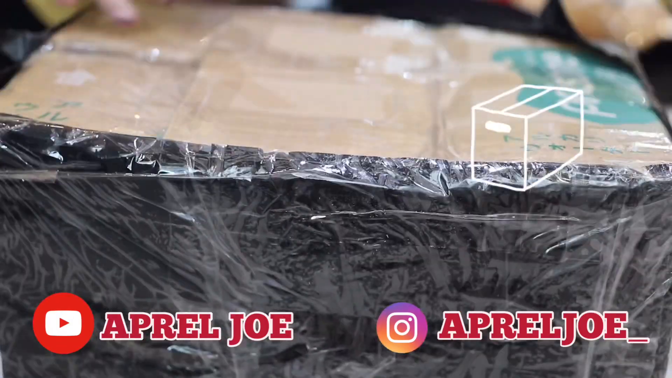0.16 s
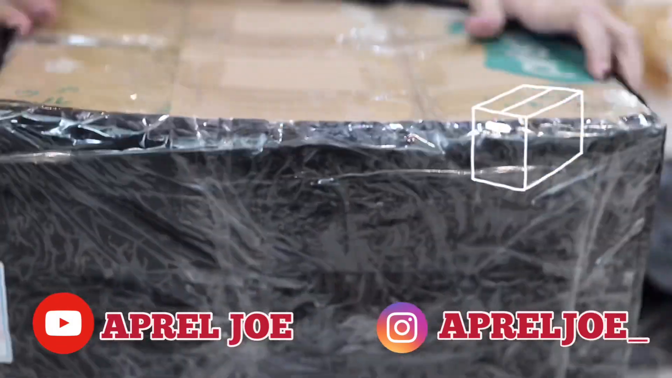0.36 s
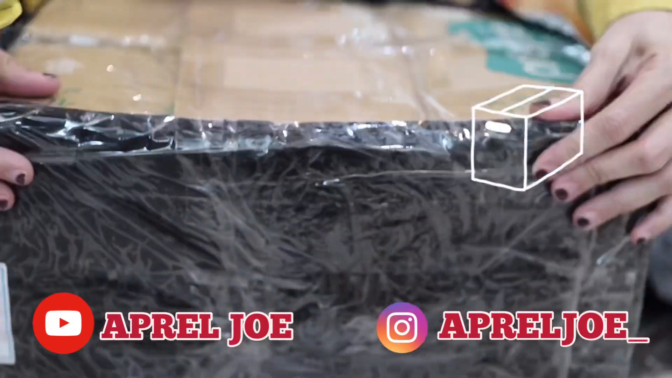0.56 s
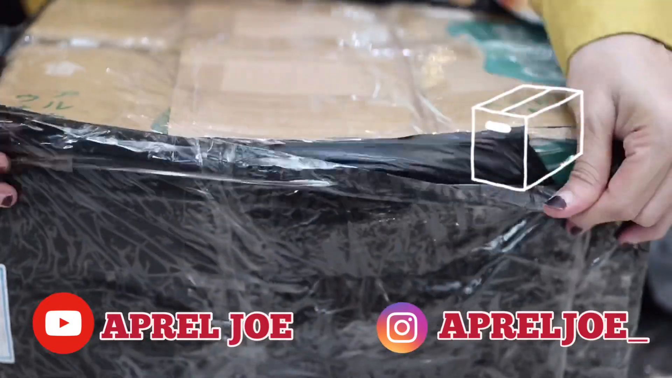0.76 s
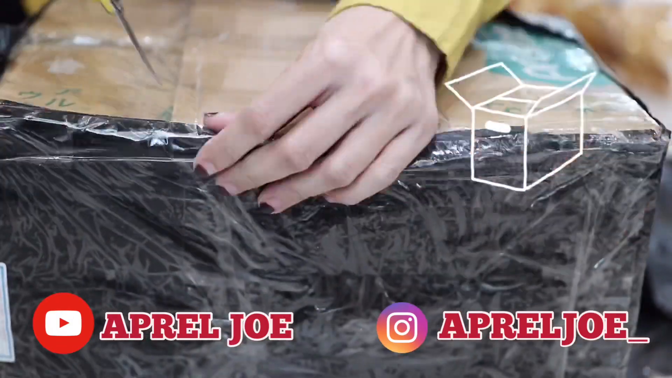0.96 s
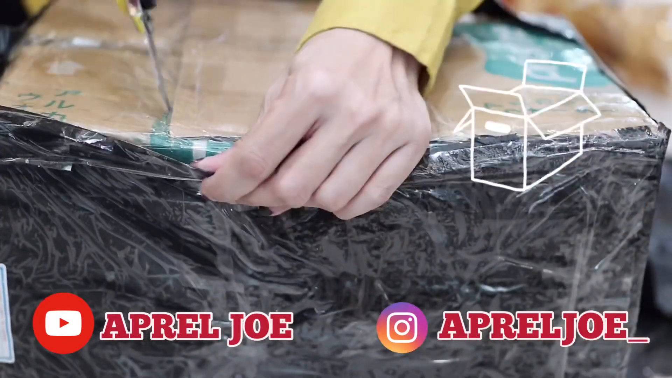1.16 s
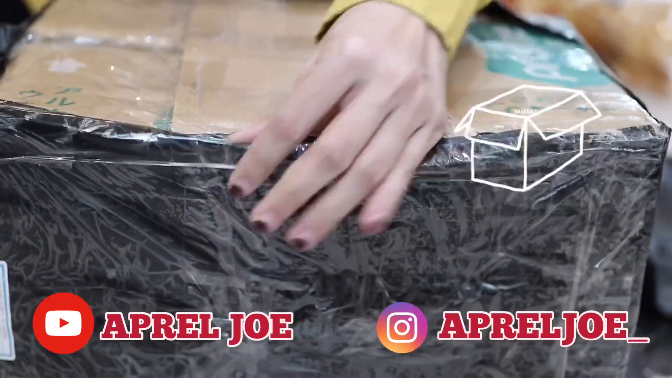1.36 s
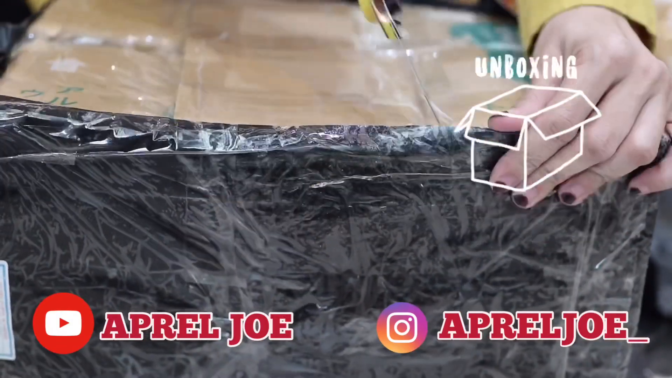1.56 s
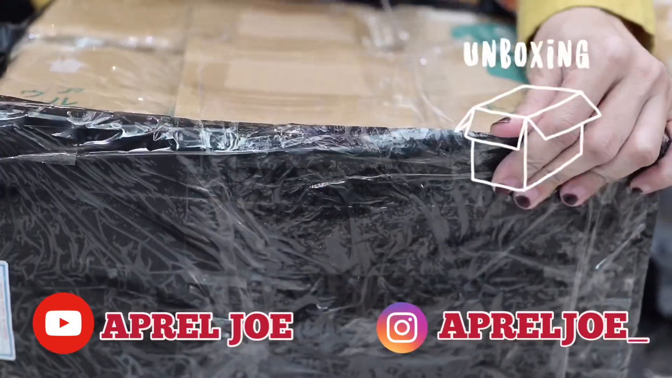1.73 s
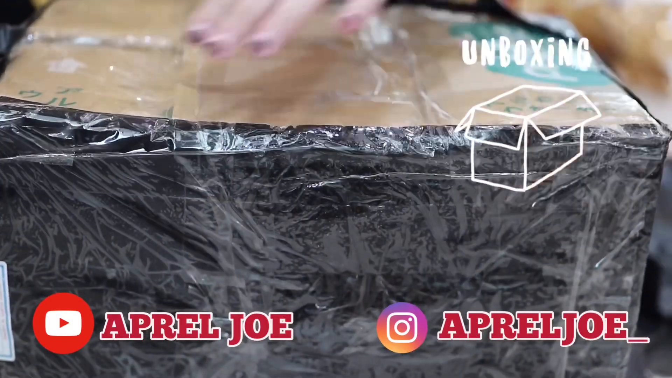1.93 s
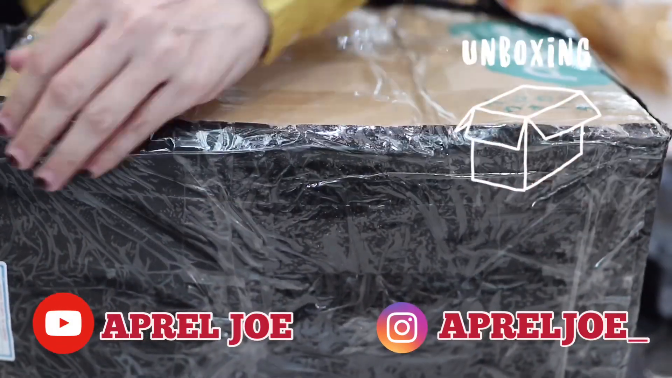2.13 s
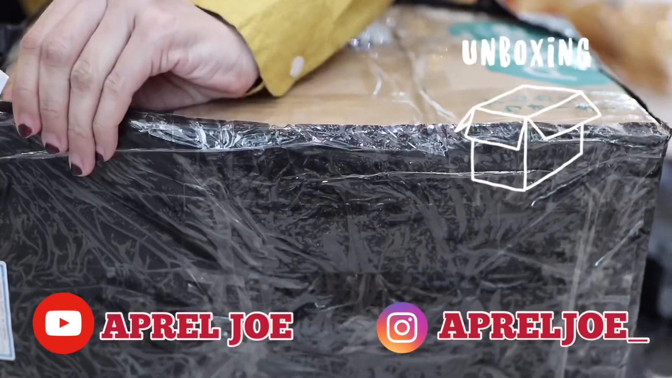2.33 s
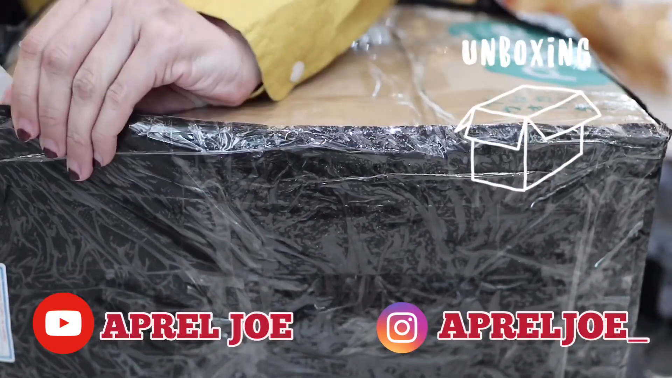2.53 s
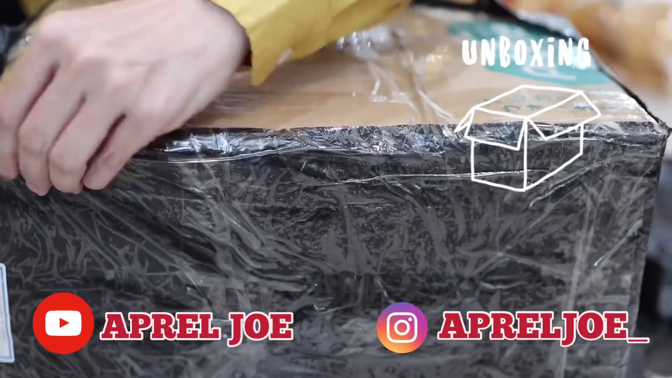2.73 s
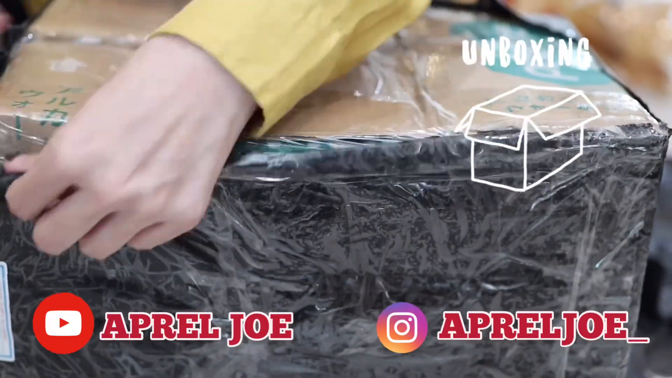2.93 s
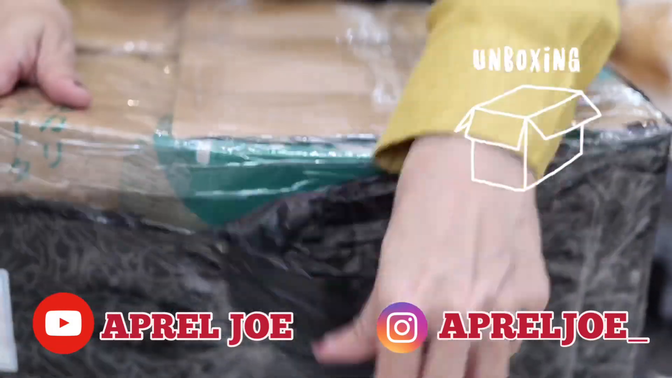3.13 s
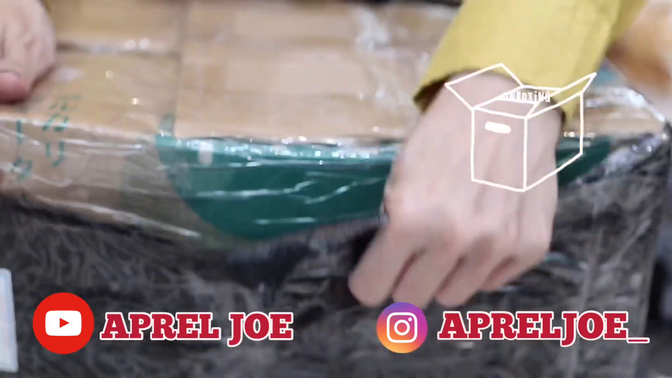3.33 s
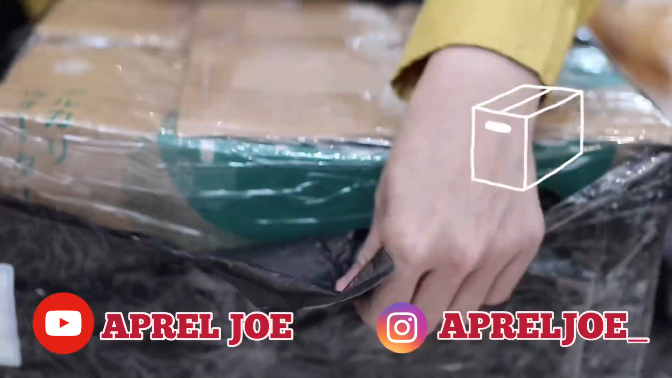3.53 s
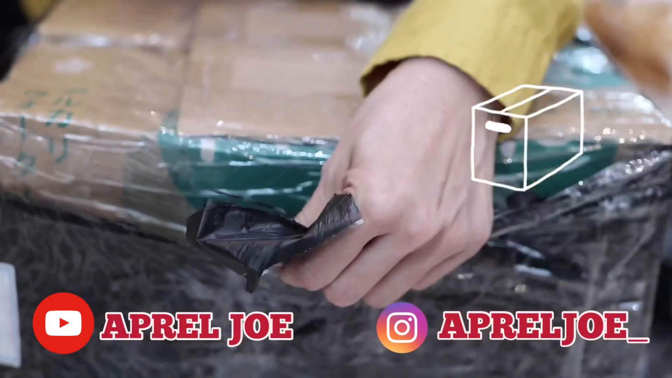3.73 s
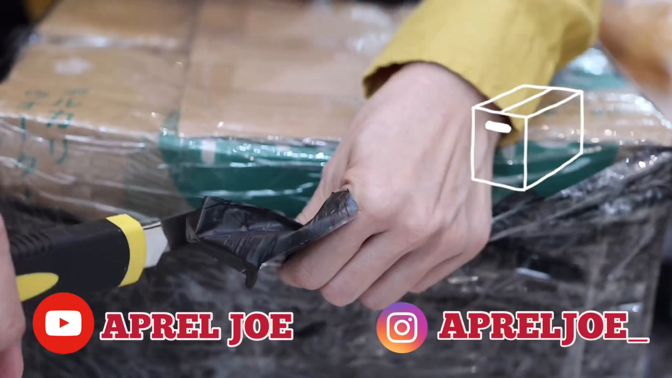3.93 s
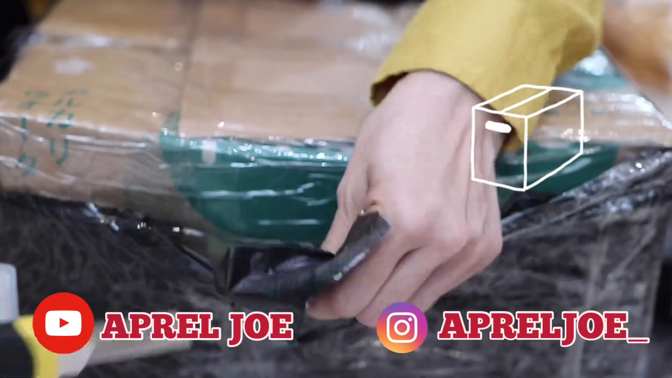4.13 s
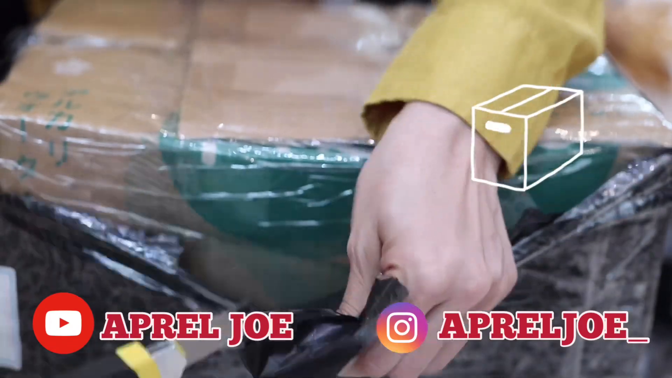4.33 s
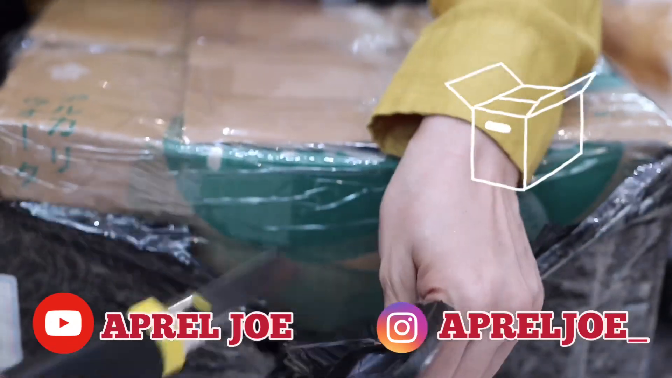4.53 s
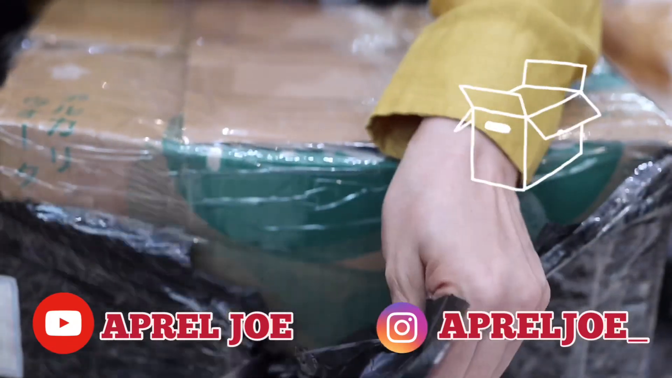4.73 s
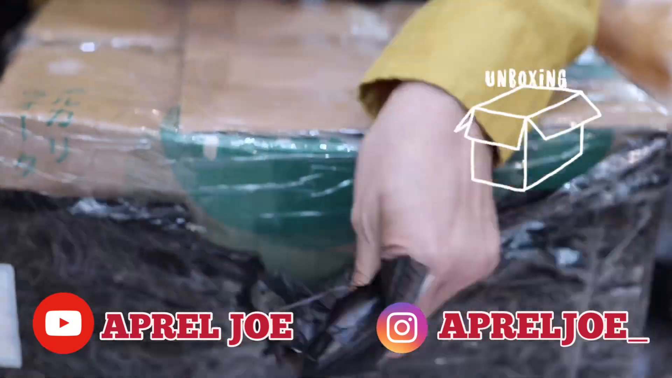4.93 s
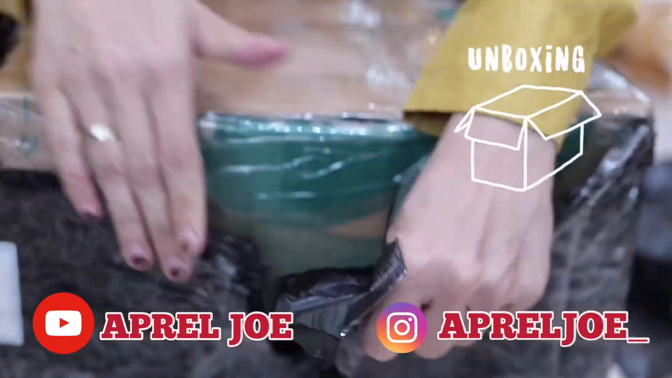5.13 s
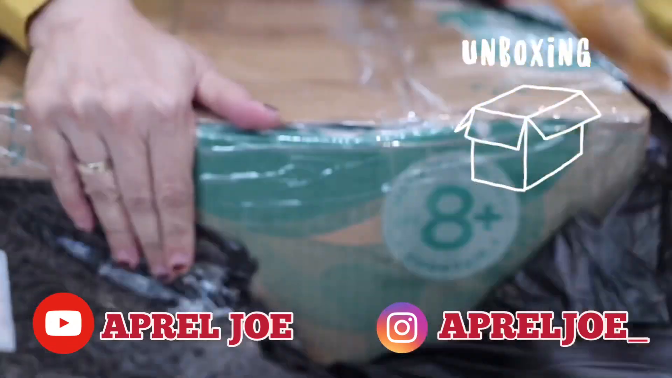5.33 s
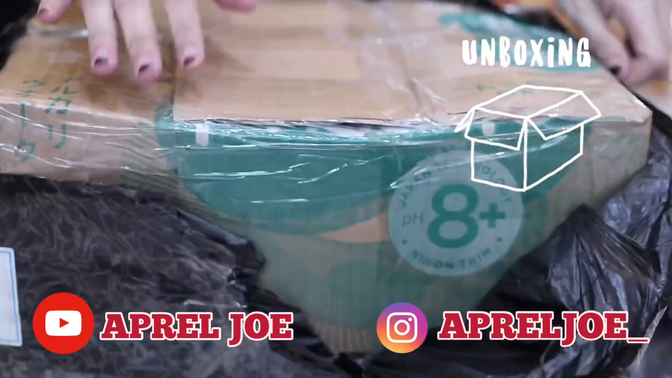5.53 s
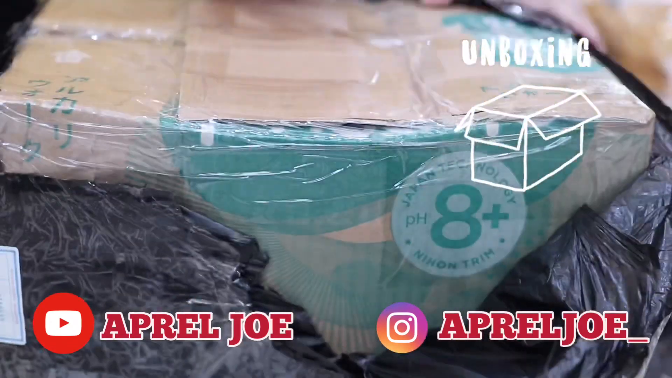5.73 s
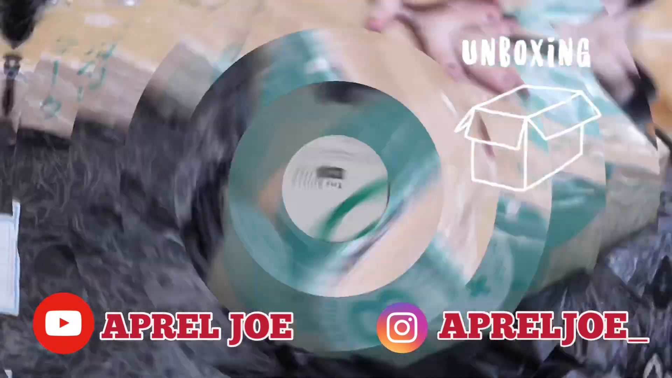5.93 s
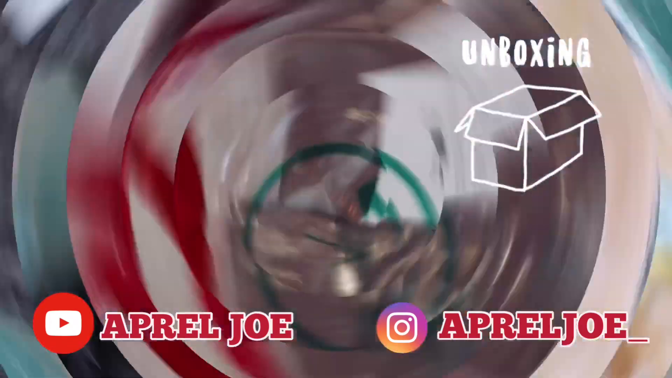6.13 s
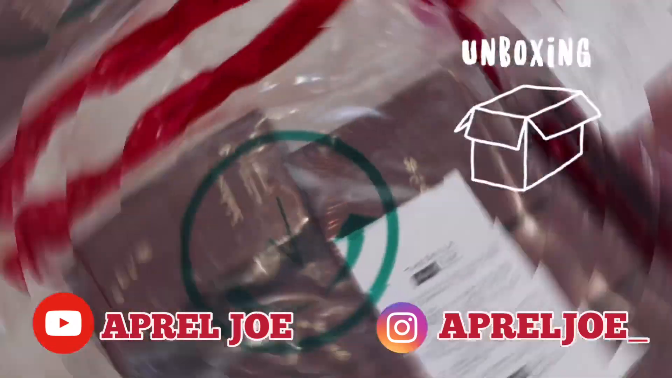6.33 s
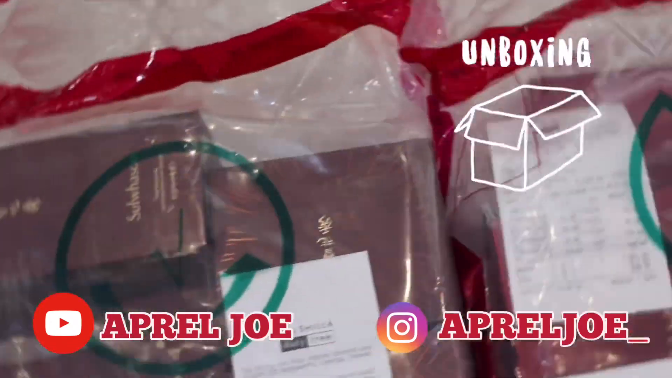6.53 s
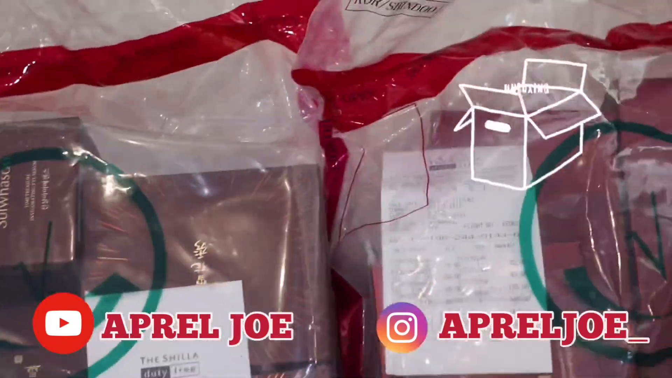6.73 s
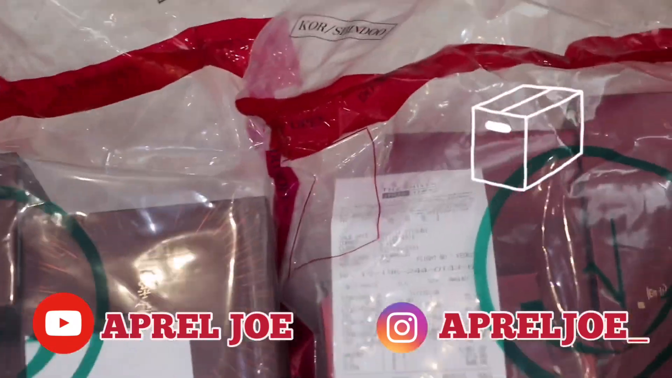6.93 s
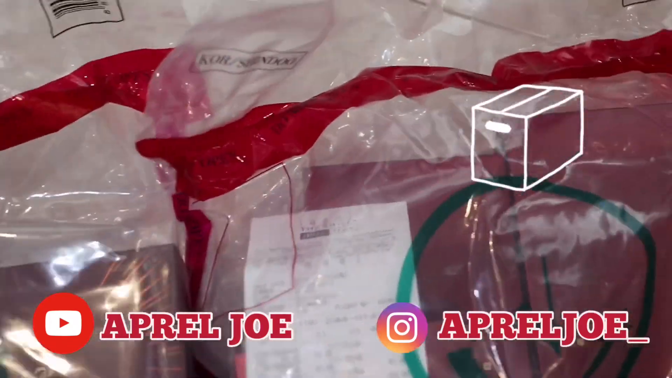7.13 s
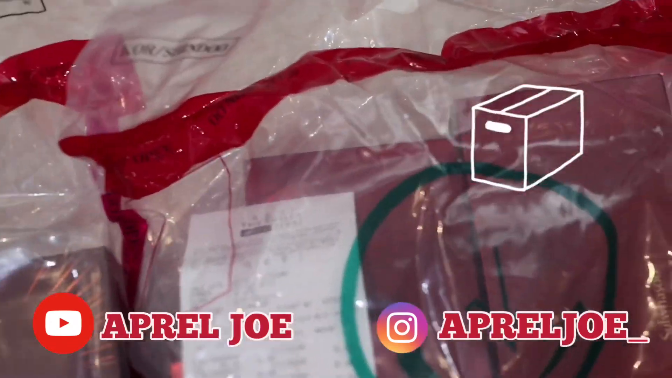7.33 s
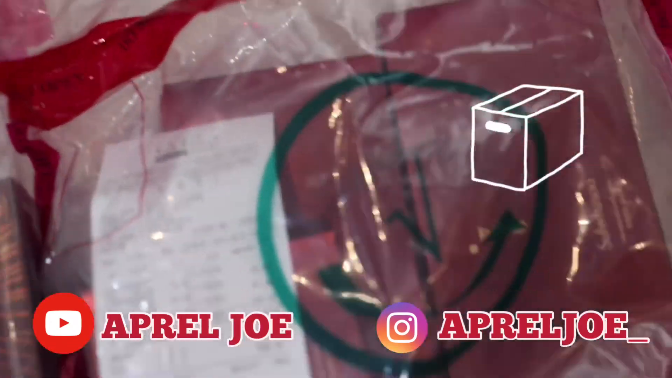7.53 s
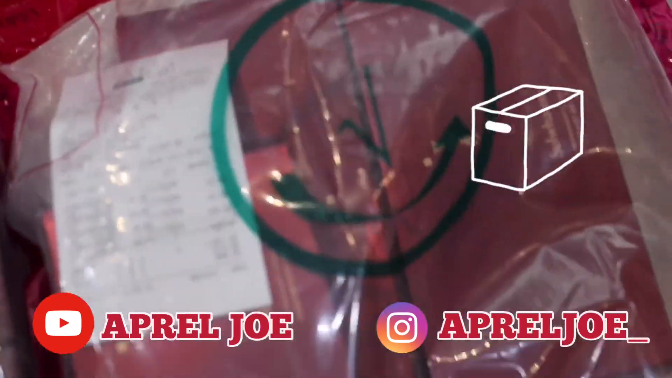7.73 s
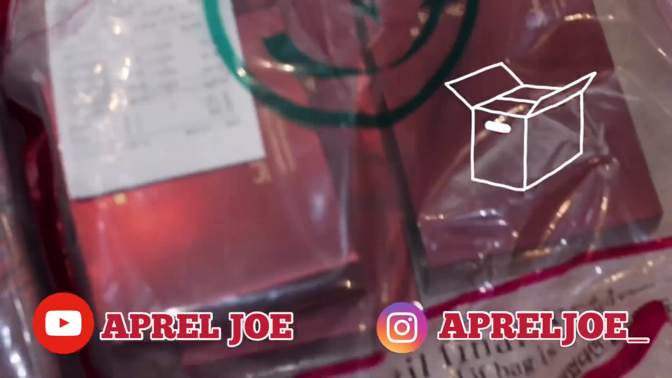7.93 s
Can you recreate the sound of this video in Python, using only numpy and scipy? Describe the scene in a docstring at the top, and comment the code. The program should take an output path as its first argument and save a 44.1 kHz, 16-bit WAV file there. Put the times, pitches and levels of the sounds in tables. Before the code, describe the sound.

Close up in a small, short-echo room, hands pull plastic film off a carton. Scattered crinkles and snaps grow into harder rips and loud cracks around three to five seconds, with small box knocks and tiny squeaks. A faint low electric hum lies beneath. Just after six seconds it dips nearly silent, then a different room's soft wash and distant swelling rumble remain.

```python
"""Small room: hands pull and tear plastic stretch wrap off a cardboard parcel, over a low electric hum.
Filtered pulses and noise bursts make the snaps, cracks and taps; dense decaying grains make the crinkle.
Gliding rough tones make the squeals; noise and slip pulses through carton resonances make the bumps and groans.
Near six seconds it fades to a second room: lower sine hum, noise wash and a swelling distant rumble."""
import sys
import numpy as np
from scipy import signal
from scipy.fft import rfft, irfft, next_fast_len
from scipy.io import wavfile
from scipy.ndimage import uniform_filter1d, map_coordinates

SR = 44100
rng = np.random.default_rng(int(sys.argv[2]) if len(sys.argv) > 2 else 0)


def transcribe(signal):
    """Save signal, clipped to [-1, 1], as a 16-bit WAV file at the path in sys.argv[1]."""
    frames = np.atleast_2d(signal).T
    limited = np.clip(frames, -1, 1)
    pcm = np.round(limited * 32767).astype(np.int16)
    wavfile.write(sys.argv[1], SR, pcm)


N = 355446

# hum lines of the first room: (frequency [Hz], rms level [dB])
HUM_LINES = [(118.4, -47.5), (236.9, -50.5)]
# spectrum of the first room's moving air: (frequency [Hz], relative level [dB])
AIR_SPECTRUM = [(25, -30), (48, -27), (94, -6.5), (250, -8.5), (335, -10), (570, -21), (775, -17.5),
                (1400, -22.5), (6700, -31), (16000, -44.5)]
# pulls on the film, each a spell of crinkling: (time [s], hold [s], level [dB], papery low-mid gain [dB])
PULLS = [(0, 0.0033, -38.5, -21), (0.111, 0.016, -38, -4), (0.218, 0.023, -46, 15.5),
         (0.49, 0.12, -53.5, 10.5), (0.583, 0.0089, -41, 0.5), (0.685, 0.029, -40, 5.5),
         (0.787, 0.22, -48, 4.5), (1.122, 0.1, -31, 2), (1.26, 0.061, -35.5, -3), (1.606, 0.071, -35.5, 4),
         (1.702, 0.024, -30.5, 6), (2.217, 0.036, -51, 4), (2.52, 0.11, -45, 3), (2.764, 0.15, -34, -4),
         (2.921, 0.078, -31, 0.5), (3.207, 0.23, -38.5, 3), (3.433, 0.022, -34.5, 6.5),
         (3.526, 0.14, -38, -0.5), (3.967, .03, -36, -7.5), (4.133, 0.011, -41, -7),
         (4.272, 0.12, -42.5, 1), (4.444, 0.0083, -36.5, 3.5), (4.557, 0.015, -40.5, 0),
         (4.628, 0.013, -38, -3), (4.695, 0.16, -40, 1), (4.896, 0.23, -35.5, -0.5),
         (5.121, 0.18, -29.5, -2), (5.433, 0.056, -42.5, 10), (5.548, .13, -44.5, 1),
         (5.753, 0.32, -42, 3.5), (5.831, 0.014, -38, 4.5), (5.987, 0.046, -32, 9),
         (6.098, 0.056, -42.5, 6)]
# smooth spectrum of the film: (frequency [Hz], relative level per Hz [dB])
FILM_SPECTRUM = [(80, -29), (300, -4.5), (600, -5.5), (1000, -1), (1900, -4), (4800, -0.5), (7000, -1.5),
                 (9000, -10), (11000, -17.5), (16000, -18)]
# resonances of the taut film: (centre [Hz], width [Hz], height over the smooth spectrum [dB])
FILM_MODES = [(1110, 84, 1), (1600, 150, 1), (2220, 270, 4), (3003, 350, 3.5), (3970, 170, 5),
              (4920, 340, 3)]
# decay of the room: (frequency [Hz], t60 [s])
WALL_DECAY = [(200, 0.26), (550, 0.12), (1400, 0.16), (3700, 0.17), (9700, 0.21), (16000, 0.082)]
# creases snapping through, the long ones short rips:
# (time [s], rms level [dB], length [s], papery low-mid gain [dB], treble sheen gain [dB])
SNAPS = [(.224, -25.5, .0022, 11, -8), (.351, -33.5, 0.006, 10, -2), (.543, -38.5, .002, 0, -1),
         (0.713, -28, .0015, 4, -11), (.962, -30.5, 0.0018, 4.5, 8), (1.2275, -27, .0034, 2, -20),
         (1.332, -33, .0037, 2, 3), (1.555, -35.5, .0026, -9, 9), (1.777, -19.5, .0019, 0, -2),
         (2.043, -22, .0012, 9, -6), (2.169, -43, .003, 9, -7), (2.224, -31, .0034, -10, -.5),
         (2.256, -35.5, 0.0064, -5, -3), (2.381, -31.5, .0038, -6, 6), (2.529, -37, 0.003, -3, -10),
         (2.555, -22, .0027, -0.5, -5), (2.695, -29.5, 0.0019, -0.5, -2.5), (2.75, -32, .002, -12, -3),
         (2.769, -23, 0.00068, -2.5, 5.5), (2.775, -19.5, 0.0017, 0.5, 1.5), (2.8016, -23, .0049, -17, 6.5),
         (2.867, -28, 0.0013, 0, 1.5), (2.885, -29.5, .0027, 11, 3.5), (2.93, -19, 0.0053, -7.5, 0.5),
         (2.939, -18.5, .0018, 5, -4), (2.946, -17.5, .002, -.5, 1.5), (3.372, -20.5, .0015, -3.5, -5),
         (3.4308, -20.5, 0.0018, 3.5, -4), (3.725, -30.5, .001, -1, -6.5), (3.8357, -34.5, .0037, -4.5, 3),
         (3.972, -14.5, .0012, 5, -3.5), (3.9904, -19, 0.0011, -5.5, 2), (4.148, -28, .002, -0.5, 2),
         (4.182, -22.5, 0.0019, -7, 0.5), (4.449, -33.5, 0.0027, -4, -0.5), (4.456, -27, .003, 5, -2),
         (4.463, -21, 0.0024, 2, -3.5), (4.539, -29.5, .0024, -1, -1), (4.57, -21, 0.0034, 1.5, -1),
         (4.619, -28, .0022, -4, -4), (4.634, -20.5, .0035, 2, -2), (4.657, -27, .003, -6, -2),
         (4.695, -26, 0.0022, -1, 1), (4.705, -23, 0.004, 3, -4), (4.7352, -19.5, 0.0034, -5, 1),
         (4.764, -23.5, .0016, 3, -5), (4.773, -17, 0.0063, 3.5, -0.5), (5.058, -30.5, .0011, 5, 0),
         (5.223, -21, .0047, 2, 4.5), (5.283, -23.5, 0.0021, 6, 3), (5.6328, -23, .0028, -5, -2),
         (5.769, -35.5, .002, 5, 0), (5.835, -26, 0.0063, -9, -4), (5.99, -27.5, 0.0027, -5, -12),
         (6.019, -18.5, 0.0035, 5, -5), (6.132, -32, .004, 19, 10)]
# taut patches popping under the fingertips: (time [s], rms level [dB], pitch [Hz])
TAPS = [(.2252, -25, 980), (.353, -34, 950), (1.2322, -19, 2640), (1.615, -27, 2920), (2.224, -27.5, 605),
        (2.885, -30.5, 885), (2.933, -18, 5670), (2.94, -19.5, 1900), (2.975, -17.5, 1270),
        (3.003, -17, 1530), (3.432, -25, 2000), (3.9068, -21.5, 930), (5.424, -32, 790), (5.445, -33, 1800),
        (6.0175, -21.5, 840)]
# taut film breaking all at once: (time [s], rms level over 1 ms [dB], papery low-mid gain [dB],
# treble sheen gain [dB], gain into the room [dB])
CRACKS = [(0.5884, -13.5, 4.5, 7, 1), (.6719, -10.5, 7, 1, 0.5), (1.7853, -12.5, -6, -9.5, -1),
          (1.7884, -14, 2, -2, -3.5), (2.9745, -9, 1, -3, -3.5), (3.002, -9, 1, 0, -0.5),
          (3.367, -16.5, -2.5, -0.5, 1), (3.4379, -19, -2, 2, 1), (3.906, -18, 12, -1, -5.5),
          (3.9626, -6, -10.5, 1.5, 0), (4.1889, -2.5, 3, -6, -6.5), (4.3129, -14, -0.5, -6, -5),
          (4.3236, -15.5, -1, -7, -3), (4.3478, -6, -5.5, -8, -7.5), (4.4007, -18.5, -7, -3, 0),
          (4.4678, -16.5, 3, -6, -4), (4.4706, -15, -2.5, -12, -5), (4.7784, -12.5, -0.5, -7.5, -3),
          (4.781, -11, 4.5, -4.5, -3), (4.7857, -12.5, -2, -8, -4), (5.1208, -14.5, -11, -3, 2),
          (5.129, -18.5, -5, -4, 2), (5.1334, -17, -4, 1, 0), (5.215, -18.5, -10, 4, 0)]
# hands and film bumping the box: (time [s], level [dB])
BUMPS = [(.672, -33), (.721, -35), (1.231, -23), (1.994, -36), (2.043, -34), (3.173, -37.5), (3.195, -33.5),
         (3.235, -36), (3.906, -31), (4.189, -30.5), (4.466, -34.5), (4.779, -22.5), (5.127, -29.5),
         (5.28, -30.5), (5.428, -31), (5.702, -34.5)]
# film dragging over the cardboard: (time [s], length [s], peak level [dB])
DRAGS = [(1.088, 0.14, -39), (1.226, 0.09, -40), (1.609, .2, -25.5), (3.192, 0.075, -42)]
# resonances of the wrapped carton: (centre [Hz], width [Hz], relative level [dB])
CARTON_MODES = [(235, 125, 0), (368, 28, -1.5), (483, 40, -7.5), (705, 87, -11.5), (920, 14, -7.5)]
# air shoved as taut film lets go: (time [s], peak level before the bass cut [dB])
PUFFS = [(2.788, -28), (4.1888, -22), (4.3494, -29)]
# strands of stretched film chirping: (time [s], length [s], start pitch [Hz], end pitch [Hz], level [dB])
SQUEAKS = [(4.896, 0.052, 4000, 4000, -35), (5.3, 0.013, 6320, 6240, -30), (4.912, 0.042, 4650, 4820, -31),
           (4.934, 0.0306, 4900, 4150, -32), (4.924, 0.033, 2440, 3050, -41), (4.3, 0.034, 1400, 1370, -37),
           (4.958, 0.073, 5500, 5400, -37), (4.963, .046, 1122, 1006, -46), (4.972, 0.043, 1613, 1520, -37),
           (5.8, .032, 1780, 1600, -44)]
# hum lines of the second room: (frequency [Hz], rms level [dB])
NEXT_HUM_LINES = [(99, -50.5), (198, -63)]
# spectrum of the second room's wash: (frequency [Hz], relative level [dB])
WASH_SPECTRUM = [(25, -34), (50, -30), (93, -12), (120, -19.5), (160, -12), (224, -10), (400, -15),
                 (790, -20.5), (3500, -38.5), (9200, -52.5), (13000, -68)]
# swelling of the distant rumble: (time [s], level [dB])
ROAR = [(6.68, -44), (7.04, -47), (7.14, -39), (7.33, -39.5), (7.45, -35), (7.57, -39.5), (7.66, -33.5),
        (7.78, -42)]
# stereo width of the parcel: (frequency [Hz], side minus mid [dB])
PARCEL_WIDTH = [(200, -45), (700, -48.5), (2000, -37.5), (4200, -18.5), (6200, -8.5), (8200, -1),
                (10500, 4), (15000, 1.5)]
# stereo width of the first room: (frequency [Hz], side minus mid [dB])
AIR_WIDTH = [(130, -51.5), (280, -24.5), (650, -11.5), (3500, -11), (8000, 4.5)]
# stereo width of the second room: (frequency [Hz], side minus mid [dB])
NEXT_WIDTH = [(100, -85), (260, -33), (650, -11), (1600, -5.5), (3500, -1.5), (10000, 8)]

# a pull tightens quickly, eases a little while held, then the film relaxes
ATTACK_S, SAG_DB_PER_S, RELEASE_DB_PER_S = 0.0046, 13, 147.5
IDLE_DB = -65  # film stirring under resting hands
SHEEN_DB, SHEEN_DB_PER_DB = 0.5, -0.03  # crinkle treble; harder pulls are slightly duller
LEAD_S, LEAD_DB = 0.0039, -27.5  # weak slip before each snap: lead scale, level re the snap
SPREAD_S = 0.000505  # lag of a crack's lowest notes behind its highest
REBOUND_S, REBOUND_DB = 0.00115, -6.5  # typical delay and gain of the freed edge's second slap
BUMP_S = 0.0054  # contact of a hand
GROAN_HZ = 245  # mean slip rate of the dragged film
CHANGE_S, FADE_OUT_S, FADE_IN_S = 6.25, 0.38, 0.49  # dip between the two rooms
TOP_HZ = 16000


def amp(db):
    """Decibels to gain."""
    return 10 ** (np.asarray(db) / 20)


def unit(x):
    """Scale to rms 1."""
    return x / np.sqrt(np.mean(x ** 2, axis=-1, keepdims=True) + 1e-20)


def along(points, hz):
    """Interpolate (Hz, value) points on a log frequency axis."""
    f, v = np.transpose(points)
    return np.interp(np.log(hz + 1), np.log(f), v)


def wobble(rate_hz):
    """Smooth random curve with this many knots a second."""
    knots = rng.standard_normal(int(N * rate_hz / SR) + 4)
    return map_coordinates(knots, [np.arange(N) * rate_hz / SR])


def causal(db):
    """Minimum-phase response with this gain on an FFT grid."""
    cepstrum = irfft(np.log(amp(db)))
    half = len(cepstrum) // 2
    folded = np.r_[cepstrum[0], 2 * cepstrum[1:half], cepstrum[half], np.zeros(half - 1)]
    return np.exp(rfft(folded))


def coloured(x, colour):
    """Causal filter set by (Hz, dB) points or a function of Hz giving dB."""
    size = 2 * next_fast_len((N + SR // 2) // 2)
    hz = np.fft.rfftfreq(size, 1 / SR)
    gain_db = colour(hz) if callable(colour) else along(colour, hz)
    return irfft(rfft(x, size) * causal(gain_db), size)[..., :N]


def add(track, s, sound):
    """Mix a sound into a track at time s."""
    part = track[..., round(s * SR):][..., :sound.shape[-1]]
    part += sound[..., :part.shape[-1]]


def burst(length_s, tone_db, smooth_hz, spiky, first=0):
    """Dying cluster of slips, optionally led by one larger slip; mid and side, energy 1, given colour."""
    size = 2 * (len(tone_db) - 1)
    t = np.arange(size) / SR
    slips = rng.standard_normal((2, size)) * np.exp(spiky * rng.standard_normal((2, size)))
    slips = slips * np.exp(-.65 * t / max(length_s, 1 / SR))
    z = rfft(slips) + first * np.linalg.norm(slips, axis=1, keepdims=True)
    # flatten the coarse spectrum before colouring
    bins = max(int(smooth_hz * size / SR), 1)
    power = np.abs(uniform_filter1d(np.abs(z) ** 2, bins, mode="mirror"))
    z /= np.sqrt(power + 1e-12)
    return unit(irfft(z * causal(tone_db))) / np.sqrt(size)


def stereo(pair, width):
    """Mid and side to left and right; the side level varies with frequency."""
    side = coloured(pair[1], width)
    return np.array([pair[0] + side, pair[0] - side])


def hum(lines, waver_db):
    """Slightly unsteady sine lines of an electric appliance, in the middle only."""
    clock_s = np.arange(N) / SR + 0.00012 * wobble(2.5)
    total = np.zeros(N)
    for hz, db in lines:
        level = np.sqrt(2) * amp(db + waver_db * wobble(3))
        total += level * np.sin(2 * np.pi * (hz * clock_s + rng.random()))
    return np.array([[1], [0]]) * total


def first_room(air_db=-46.5):
    """Hum and soft moving air, the air as filtered noise."""
    air = unit(coloured(rng.standard_normal((2, N)), AIR_SPECTRUM))
    return hum(HUM_LINES, waver_db=-0.5) + amp(air_db) * air


def film_db(hz):
    """Film spectrum: smooth curve plus resonance peaks."""
    peaks = sum(db / (1 + (2 * (hz - centre) / width) ** 2) for centre, width, db in FILM_MODES)
    return along(FILM_SPECTRUM, hz) + peaks


def facets(life_s=.0006, scatter_db=4, count=13000, size=240):
    """Small film facets flip over, each a decaying sine at its own pitch."""
    when, pitch = rng.random((2, count, 1))
    life, strength = np.clip(rng.standard_normal((2, count, 1)), -2, 2)
    hz = 500 * 32 ** pitch
    life = life_s * np.exp(life / 2)
    t = np.arange(size) / SR
    ringing = np.exp(-t / life) * np.sin(2 * np.pi * hz * t)
    grains = amp(scatter_db * strength) * np.sqrt(hz / life) * ringing
    index = ((when * N).astype(int) + np.arange(size)).ravel()
    signs = rng.choice([-1, 1], (2, count, 1))
    return unit(np.array([np.bincount(index, (grains * sign).ravel(), N)[:N] for sign in signs]))


def flexing(x, depth_db, band_bins=4, life_frames=7, size=512):
    """Film panels change shape, so narrow resonances come and go within hundredths of a second."""
    z = signal.stft(x, nperseg=size)[2]
    field = uniform_filter1d(rng.standard_normal(z.shape[1:]), band_bins, axis=0)
    field = uniform_filter1d(field, life_frames, axis=1)
    gain = amp(depth_db * np.clip(field / field.std(), -2, 2))
    return unit(signal.istft(z * gain, nperseg=size)[1][:, :N])


def effort():
    """Crinkle level and papery gain [dB]: each pull rises, holds and relaxes over the idle stir."""
    t = np.arange(SR) / SR
    power, papery = np.full((2, N), amp(IDLE_DB) ** 2)
    for s, hold_s, db, low_db in PULLS:
        sag_db = SAG_DB_PER_S * np.minimum(t, hold_s)
        release_db = RELEASE_DB_PER_S * np.maximum(t - hold_s, 0)
        shape = np.minimum(t / ATTACK_S, 1) * amp(db - sag_db - release_db)
        add(power, max(s, 0), shape ** 2)
        add(papery, max(s, 0), (shape * amp(low_db)) ** 2)
    return 10 * np.log10(power), 10 * np.log10(papery / power)


def crinkle(ticks_per_s=90, scatter_db=1.5, tick_db=0, rub_db=-9, clump_db=0.48, busy_db=-26):
    """Facets flip and layers rub; single ticks stand out in slack film and sink when it is worked hard."""
    db, low_db = effort()
    sheen_db = SHEEN_DB + SHEEN_DB_PER_DB * (db - busy_db)
    sizes = amp(scatter_db * np.minimum(rng.standard_normal(N), 2))
    sizes = sizes * (rng.random(N) < ticks_per_s / SR)
    ticks = unit(sizes * rng.choice([-1, 1], (2, N)))
    slack = 1 / (1 + amp(db - busy_db))
    rub = amp(rub_db) * rng.standard_normal((2, N))
    film = facets() + slack * amp(tick_db) * ticks + rub
    film = flexing(coloured(film, film_db), depth_db=2)
    # broad folds lift the low-mids, tight ones the treble
    low = signal.sosfiltfilt(signal.butter(2, [450, 1700], "band", fs=SR, output="sos"), film)
    high = signal.sosfiltfilt(signal.butter(3, 6500, "high", fs=SR, output="sos"), film)
    film = film + (amp(low_db) - 1) * low + (amp(sheen_db) - 1) * high
    return film * amp(db + clump_db * wobble(60))


def room(x, wet_db, delay_s, build_s, edge_count=28):
    """Near walls answer within milliseconds; a fresh noise tail per stretch of time as the hands move."""
    out = np.zeros((2, N))
    edges = np.linspace(0, N, edge_count).astype(int)
    for a, b in zip(edges, edges[1:]):
        hz, t, z = signal.stft(rng.standard_normal((2, SR // 3)), SR, nperseg=256)
        decay = amp(-60 * t / along(WALL_DECAY, hz)[:, None])
        tail = signal.istft(z * decay, SR, nperseg=256)[1]
        age_s = np.arange(tail.shape[1]) / SR
        tail = tail * (1 - np.exp(-np.maximum(age_s - delay_s, 0) / build_s))
        tail = tail / np.linalg.norm(tail, axis=1, keepdims=True)
        add(out, a / SR, signal.fftconvolve(x[:1, a:b], tail, axes=1))
    tone = [(200, -7.5), (1000, -3.0), (4000, -3.0), (8000, -0.5), (15000, 10.0)]
    return amp(wet_db) * coloured(out, tone)


def snaps(spiky=0.59, top_db=2, first=0.28, size=2048):
    """A crease gives way with a crack and a few slips; broad folds sound papery, tight ones bright."""
    out, hz = np.zeros((2, N)), np.fft.rfftfreq(size, 1 / SR)
    for s, db, length_s, low_db, sheen_db in SNAPS:
        # fold size tilts the film's colour
        fold_db = along([(420, min(low_db, 0)), (750, low_db), (1400, low_db), (2400, 0.0021),
                         (5500, 0.028), (7800, sheen_db), (14000, sheen_db + top_db)], hz)
        tone_db = film_db(hz) + fold_db
        strength = amp(db) * np.sqrt(abs(length_s) * SR)
        add(out, s, strength * burst(length_s, tone_db, 3500, spiky, first))
        slip = amp(LEAD_DB) * strength * burst(LEAD_S / 2, tone_db, 2200, spiky)
        add(out, s - LEAD_S * rng.uniform(0.4, 2.3), slip)
    return out


def taps(q=2.75, contact_s=0.0027, ring_s=0.018, ring_db=-17, size=4096):
    """A taut patch under a fingertip answers like a small drumhead, then shivers faintly."""
    out, hz = np.zeros((2, N)), np.fft.rfftfreq(size, 1 / SR) + 1
    for s, db, pitch_hz in TAPS:
        detune = q / 2 * (hz / pitch_hz - pitch_hz / hz)
        tone_db = np.maximum(-20 * np.log10(1 + detune ** 2), -60)
        hit = amp(db) * np.sqrt(contact_s * SR) * burst(contact_s / 2, tone_db, 800, 0.36)
        shiver = amp(db + ring_db) * np.sqrt(ring_s * SR) * burst(ring_s, tone_db, 800, .5)
        add(out, s, hit)
        add(out, s, shiver)
    return out


def cracks(ring_db=3.0, ring_hz=500, spread_hz=2500, size=1024):
    """A clean pulse rings a film panel and rebounds; returns the direct sound and the send to the walls."""
    direct, sent = np.zeros((2, 2, N))
    hz = np.fft.rfftfreq(size, 1 / SR)
    # low notes cross the film later than high ones
    lag = np.exp(-2j * np.pi * SPREAD_S * spread_hz * (1 - np.exp(-hz / spread_hz)))
    for s, db, low_db, sheen_db, room_db in CRACKS:
        fold_db = along([(420, min(low_db, 2)), (750, low_db), (1400, low_db), (2400, 0),
                         (5500, 0), (7800, sheen_db)], hz)
        rebound_s = REBOUND_S * amp(rng.normal())
        for delay_s, gain in [(0, 1), (rebound_s, amp(REBOUND_DB))]:
            # each panel has resonances of its own
            panels = [map_coordinates(row, [hz / ring_hz]) for row in rng.standard_normal((2, size))]
            tones_db = [film_db(hz) + fold_db + ring_db * panel for panel in panels]
            pulse = unit(np.array([irfft(lag * causal(tone_db)) for tone_db in tones_db]))
            pulse = pulse * gain * amp(db) * np.sqrt(SR / 1000 / size)  # rms over 1 ms
            add(direct, s + delay_s, pulse)
            add(sent, s + delay_s, amp(room_db) * pulse)
    return direct, sent


def carton_db(hz, wall_db=-19):
    """Carton resonances over the dull thud of its walls."""
    modes = sum(amp(db) ** 2 / (1 + ((hz ** 2 - centre ** 2) / (hz * width + 1)) ** 2)
                for centre, width, db in CARTON_MODES)
    thud = amp(wall_db + along([(30, -46.5), (150, 3.0), (700, -4), (4000, -38.5)], hz))
    bass_cut = 1 + (130 / (hz + 1)) ** 4  # small walls radiate little bass
    return 10 * np.log10(modes / bass_cut + thud ** 2)


def box(judder_db=2, stray=0.09, jitter=.09, scrape_db=-1, rasp_db=-4.5, ring_s=0.012, size=4096):
    """The hollow carton booms when bumped and groans as film sticks and slips across it in arched strokes."""
    stroke = np.zeros(N)
    for s, length_s, db in DRAGS:
        add(stroke, s, amp(db) * np.sin(np.linspace(0, np.pi, int(length_s * SR))))
    cycles = np.cumsum(GROAN_HZ * (1 + stray * wobble(25) + jitter * wobble(300))) / SR
    slips = unit(np.diff(np.floor(cycles), prepend=0)) * np.array([[1], [.5]])
    scrape = amp(scrape_db) * rng.standard_normal((2, N))
    groan = unit(coloured((slips + scrape) * amp(judder_db * wobble(120)), carton_db))
    # each slip also rasps in the film itself
    rasp = rng.standard_normal((2, N)) * (1 - cycles % 1) ** 2
    rasp = coloured(rasp, lambda hz: film_db(hz) + along([(3200, -3.5), (6000, -11)], hz))
    out = (groan + amp(rasp_db) * flexing(rasp, depth_db=4.5)) * stroke
    hz = np.fft.rfftfreq(size, 1 / SR)
    tone_db = uniform_filter1d(carton_db(hz), size=11)  # a hand on the wall damps its resonances
    for s, db in BUMPS:
        add(out, s, amp(db) * np.sqrt(ring_s * SR) * burst(BUMP_S, tone_db, 300, 0.49))
    return out


def puffs(push_s=0.0006):
    """A short one-sided push of air, a dull thump under the snap."""
    out, u = np.zeros((2, N)), np.arange(SR // 20) / SR / push_s
    for s, db in PUFFS:
        add(out[0], s, amp(db) * u * np.exp(1 - u))
    return signal.sosfilt(signal.butter(1, 40, "high", fs=SR, output="sos"), out)


def squeal(jitter=.045, stray=0.0152, flutter_db=3, overtone_db=-20, rough_db=-5, rough_hz=500):
    """A sliding strand sticks and slips: a brief hoarse tone gliding as its tension changes."""
    out = np.zeros(N)
    for s, length_s, start_hz, end_hz, db in SQUEAKS:
        u = np.linspace(0, 1, int(length_s * SR))

        def chance(rate_hz):
            """Smooth random curve over the strand's slide."""
            knots = rng.standard_normal(int(length_s * rate_hz) + 4)
            return map_coordinates(knots, [u * length_s * rate_hz])

        glide_hz = start_hz + (end_hz - start_hz) * u
        pitch_hz = glide_hz * (1 + jitter * chance(1805) + stray * chance(112))
        phase = 2 * np.pi * np.cumsum(pitch_hz) / SR
        tone = np.sin(phase) + amp(overtone_db) * np.sin(2 * phase)
        # uneven grip roughens the tone, faster at higher pitch
        grip = 1 + amp(rough_db) * chance(rough_hz * start_hz / 2000)
        voice = unit(tone * grip * amp(flutter_db * chance(146)))
        add(out, s, amp(db) * np.sin(np.pi * u) * voice)
    return out * np.array([[1], [.5]])


def second_room(steady_db=-45.0, waver_db=1.0, tick_s=7.8935, tick_db=-41, rustle_db=-57,
                rustle_s=0.066, size=16384):
    """Steady noise wash, lower hum, rumble swelling in the room's low resonance, one soft rustling tick."""
    wash = unit(coloured(rng.standard_normal((2, N)), WASH_SPECTRUM))
    resonance = [(80, -55.0), (160, -7.5), (228, 5.0), (310, -11.5), (440, -16.0), (800, -29.0), (13000, -91)]
    boom = unit(coloured(rng.standard_normal((2, N)), resonance))
    roar_s, roar_db = np.transpose(ROAR)
    swell_db = np.interp(np.arange(N) / SR, roar_s, roar_db) + waver_db * wobble(12)
    out = hum(NEXT_HUM_LINES, waver_db=2.5) + amp(steady_db) * wash + amp(swell_db) * boom
    hz = np.fft.rfftfreq(size, 1 / SR)
    tone_db = along([(800, -11.0), (2200, 3), (5600, -4), (7000, -29), (14000, -57.5)], hz)
    for db, length_s in [(tick_db, .002), (rustle_db, rustle_s)]:
        add(out, tick_s, amp(db) * np.sqrt(length_s * SR) * burst(length_s, tone_db, 950, 0.83))
    return out


def scene():
    """The parcel in its room, then the second room."""
    parcel = crinkle() + snaps() + taps() + box() + squeal()
    breaks, sent = cracks()
    echoes = room(parcel + sent, wet_db=-6.0, delay_s=0.00076, build_s=0.0035)
    near = parcel + breaks + echoes + puffs()
    opening = stereo(near, PARCEL_WIDTH) + stereo(first_room(), AIR_WIDTH)
    closing = stereo(second_room(), NEXT_WIDTH)
    return np.where(np.arange(N) / SR < CHANGE_S, opening, closing)


def record(dry, dip_db=-38):
    """Fade between the rooms, clip at full scale, limit the band."""
    t = np.arange(N) / SR - CHANGE_S
    fade = np.where(t < 0, np.abs(t / FADE_OUT_S), t / FADE_IN_S)
    x = np.clip(dry * np.clip(fade, amp(dip_db), 1), -1, 1)
    return signal.sosfilt(signal.ellip(12, .1, 80, TOP_HZ, fs=SR, output="sos"), x)


dry = scene()
out = record(dry)
transcribe(out)
```